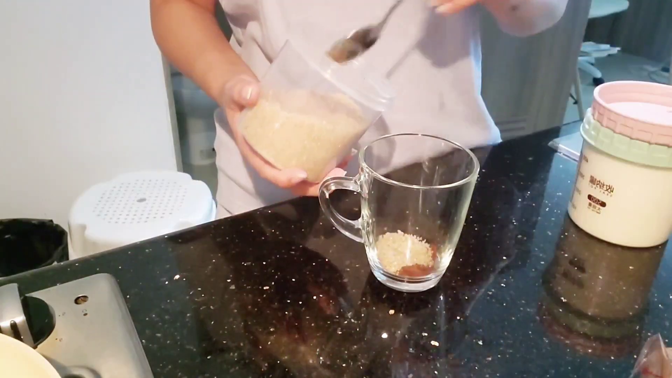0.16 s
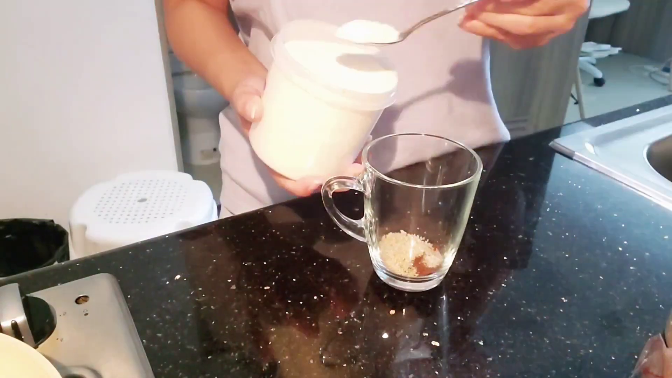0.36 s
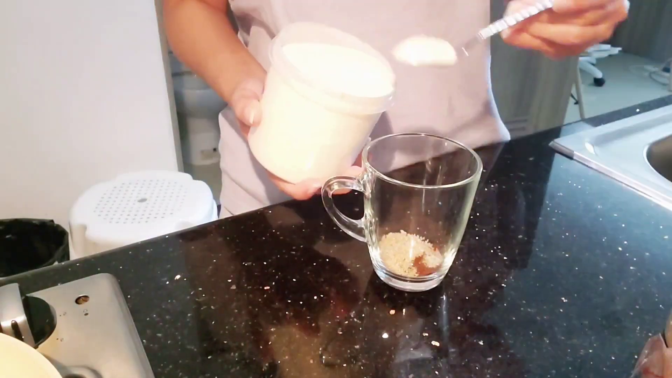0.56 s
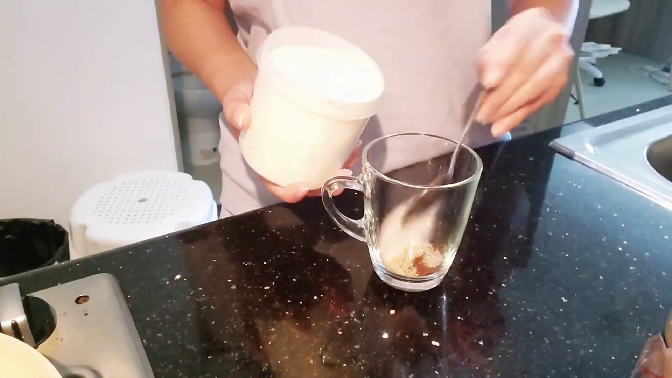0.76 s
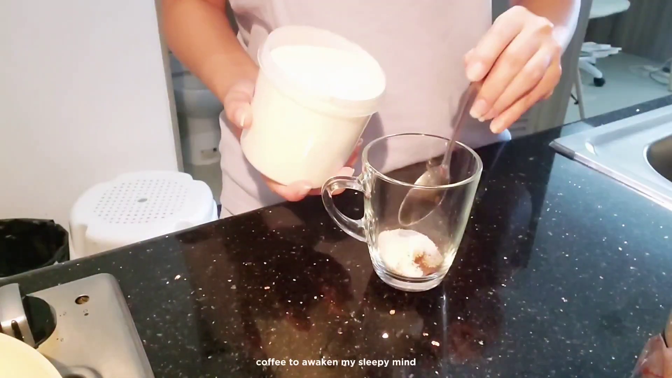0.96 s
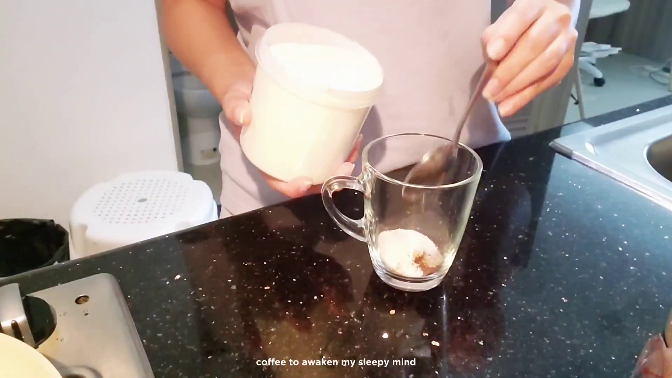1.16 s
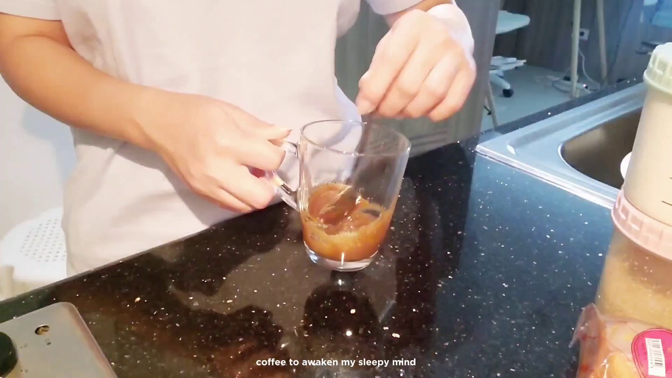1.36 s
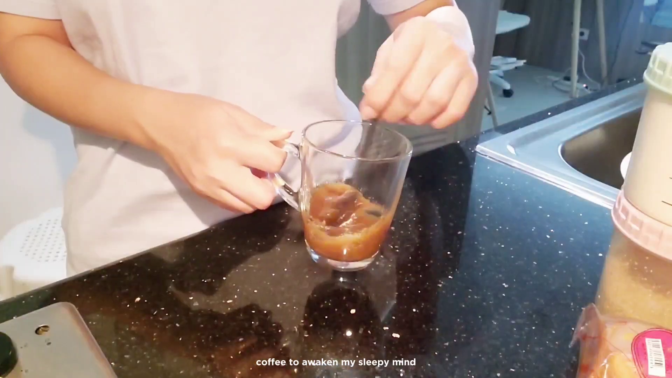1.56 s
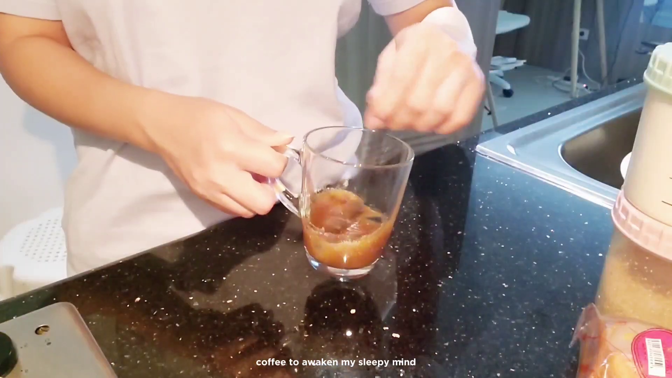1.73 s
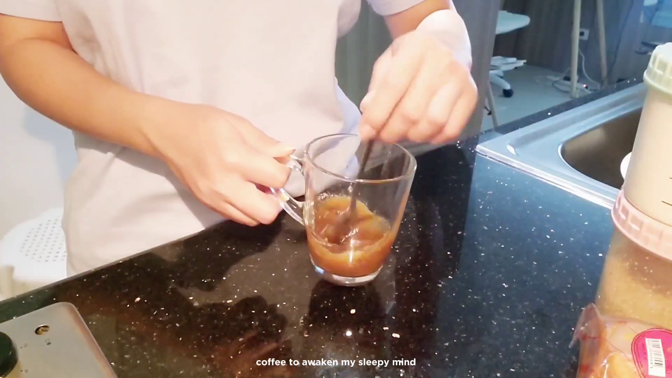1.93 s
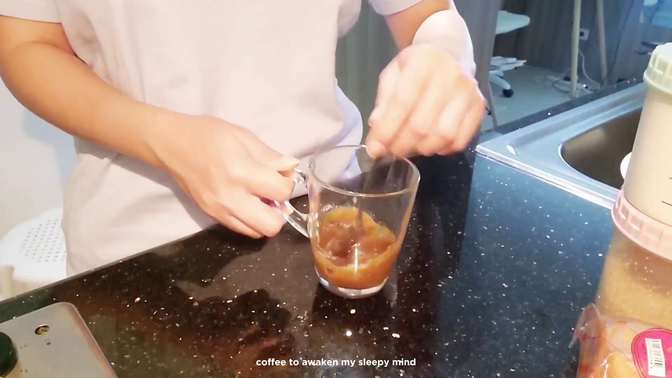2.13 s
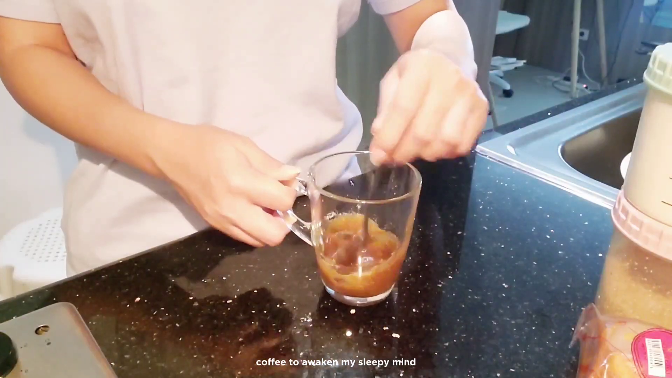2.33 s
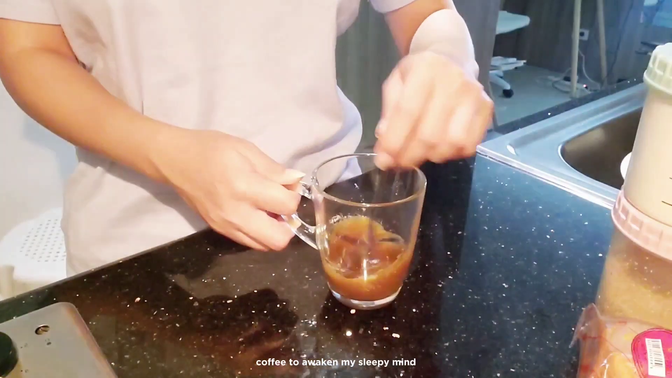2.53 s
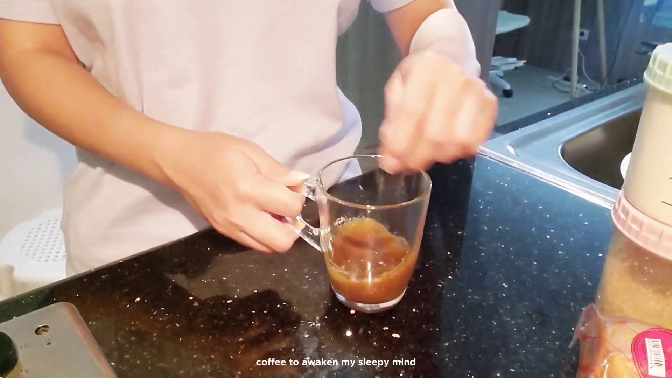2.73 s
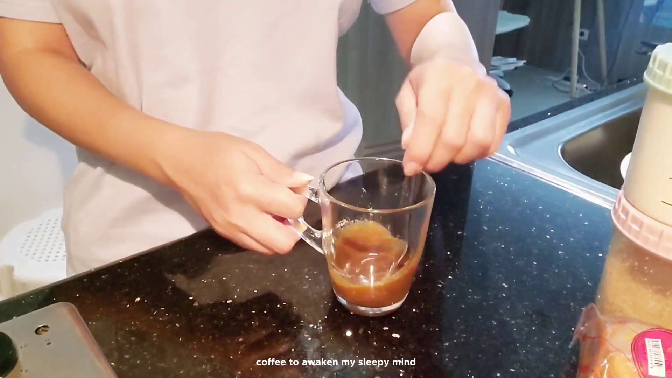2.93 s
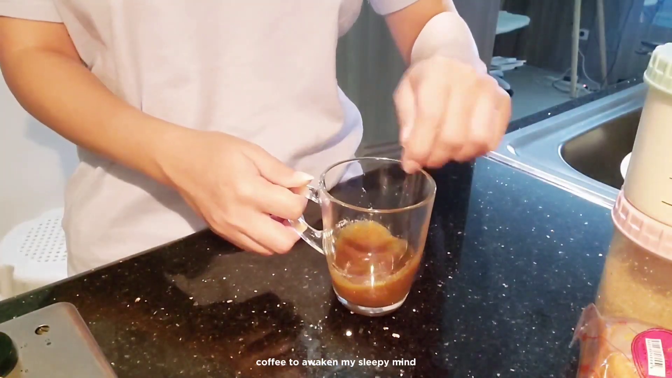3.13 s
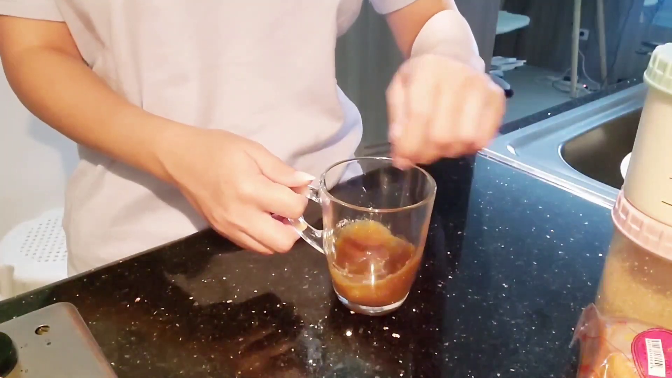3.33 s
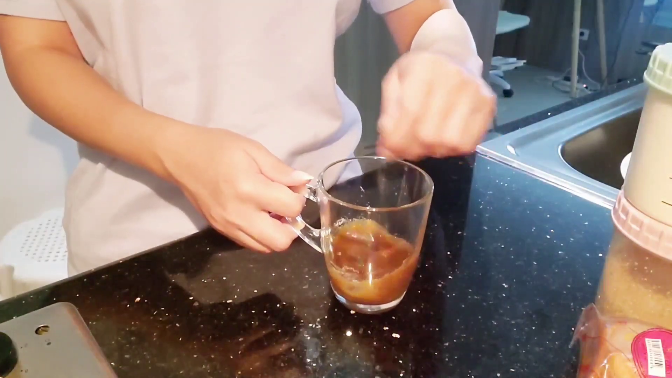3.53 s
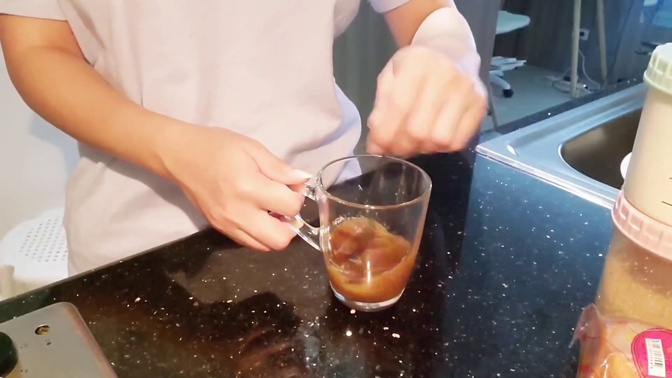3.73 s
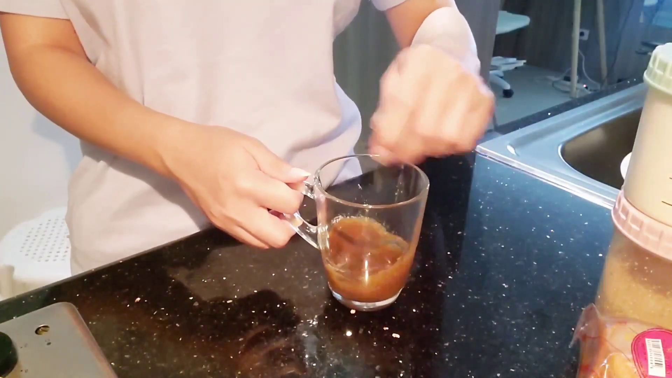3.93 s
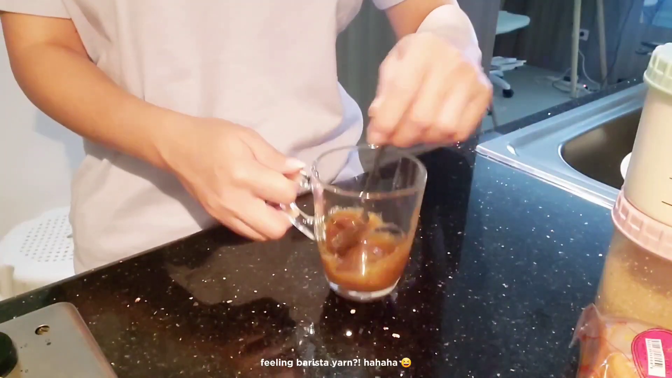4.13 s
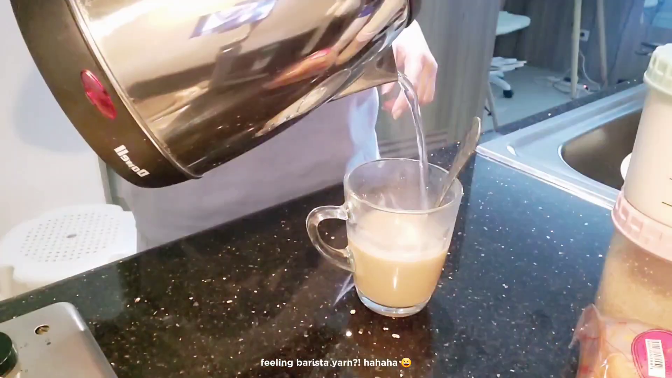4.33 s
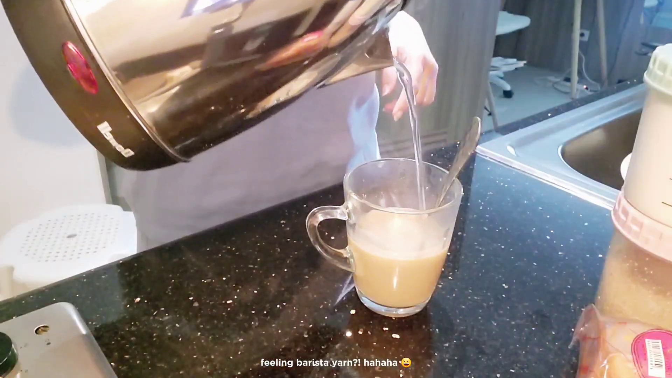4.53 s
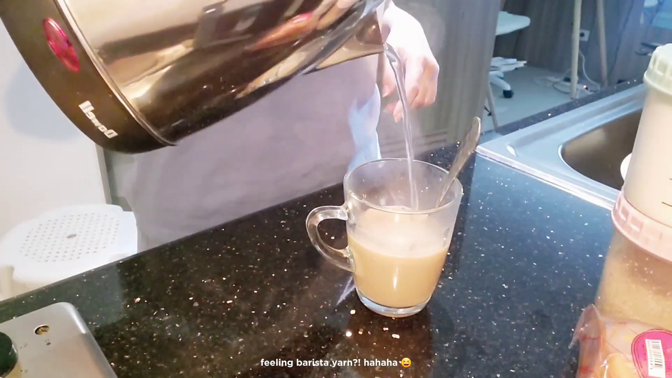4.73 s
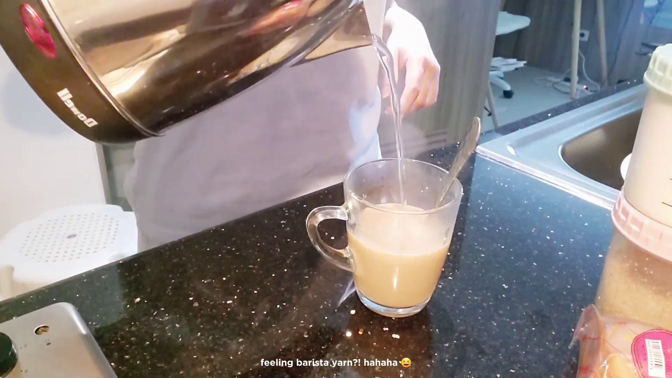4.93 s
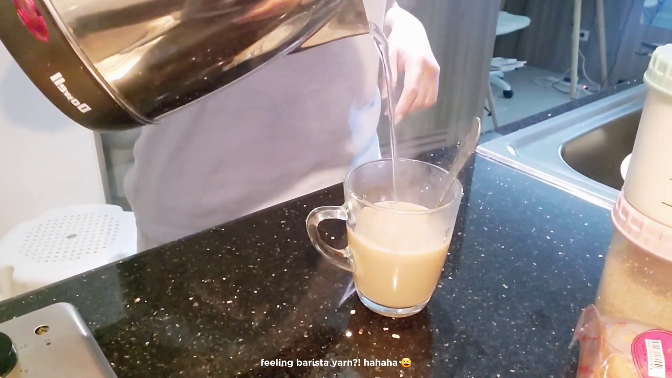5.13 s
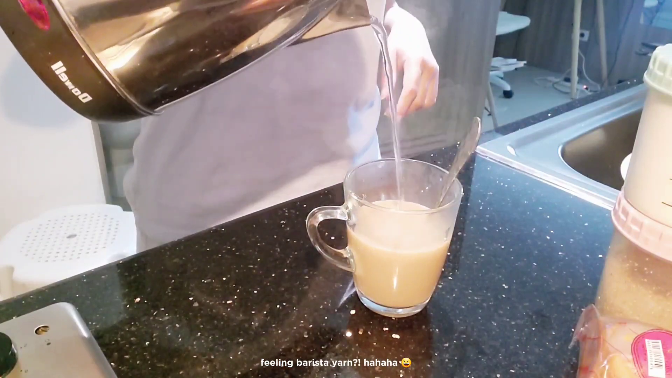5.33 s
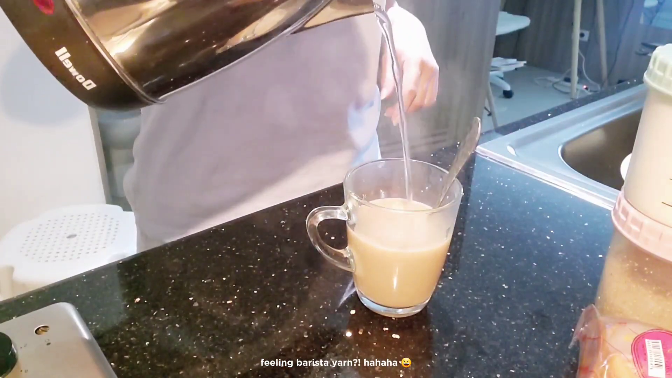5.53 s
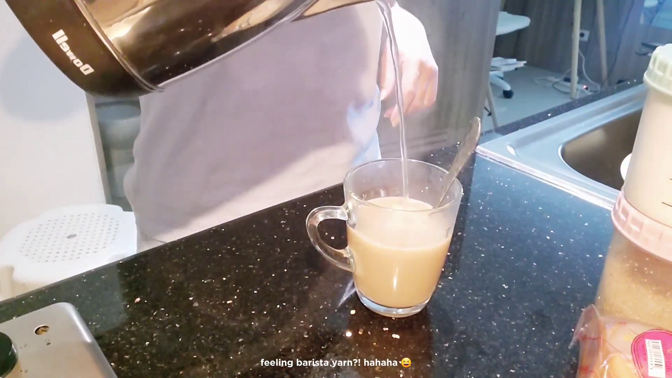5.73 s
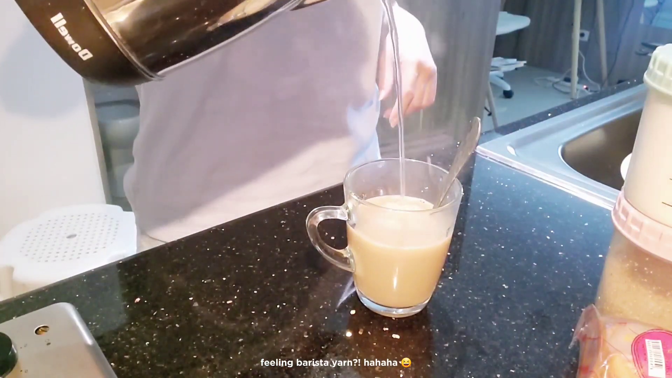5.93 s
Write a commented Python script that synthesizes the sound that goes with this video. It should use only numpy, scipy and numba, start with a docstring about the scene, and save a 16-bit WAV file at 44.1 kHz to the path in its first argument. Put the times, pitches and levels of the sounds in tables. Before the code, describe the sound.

Low rumble alone for over a second, then lively stirring close by: sharp, dry knocks of metal on glass, some loud, some barely there, joined by grainy rubbing along the wall and faint thuds of the stone counter. Afterwards comes a gentle, hissy pour with little wet ticks and a pair of dim distant hoots. Close phone pickup, short bright reflections, constant hiss.

```python
"""Stirring coffee in a glass mug

A steel spoon stirs a little thick coffee in a glass mug on a stone counter; then water is poured in gently.
Spoon knocks and scrapes are short pushes and gritty noise that set off families of quickly fading modes.
Droplets tick and spray, and two faint toots sound. Shaped noise makes the room air with the trickle,
low building rumble and a hiss that steps up once, just before the first knock. A phone nearby hears it all."""
import sys
import numpy as np
from scipy import signal
from scipy.fft import rfft, irfft
from scipy.io import wavfile
from numba import njit

SR = 44100
rng = np.random.default_rng(int(sys.argv[2]) if len(sys.argv) > 2 else 0)


def generate_wav(signal):
    """Clip the signal to [-1, 1] and save it as 16-bit WAV at the path in sys.argv[1]."""
    frames = np.transpose(np.atleast_2d(signal))
    scaled = np.clip(frames, -1, 1) * 32767
    pcm = np.round(scaled).astype(np.int16)
    wavfile.write(sys.argv[1], SR, pcm)


N = 267642

# pitches at which the strength of a bright crack or spray is set [Hz]
TREBLE_HZ = np.arange(7000, 15000, 700)


def spoon():
    """Knocks and the gritty drag of steel on sugar drive the same modes; the counter thuds below."""
    # modes of mug and spoon in seven families, low to high; the fourth is the rim:
    # f/Hz, level/dB, time to fall 60 dB t60/s, left minus right/dB, phase by which left leads/rad
    mug = [
        [(562, -22.5, 0.2, -2, 0.33), (637.6, 2.5, 0.051, -8, 0.98), (724, -0.5, 0.056, -8.5, 4.5)],
        [(918, 1.5, 0.097, 1, 3.5), (960, -5.5, 0.085, 12.5, 3.5), (995, -7.5, 0.033, 14.5, -3)],
        [(1146, -1, 0.017, -26, -1.7), (1388, 2, 0.017, 13.5, -1.55), (1642, 0.5, 0.02, -9.5, -1.36)],
        [(1864, -4, .19, 2.1, .2), (1890, -2, .035, 1.1, .4)],
        [(2220, -9, 0.027, 20, 0.3), (2350, -6, 0.066, 0.5, 0.32), (2560, -2.5, 0.036, -6, 0.39),
         (2734, -4, 0.027, 22, 0.89), (3003, 2, 0.0098, -22.5, 2.6), (3228, 2, 0.049, 6, 1.54)],
        [(3813, -7, 0.045, 7, 4), (4175, 1.5, 0.013, -7, 0.9), (4480, -8, 0.014, 25, 3.5),
         (5140, -1.5, 0.0095, -25, 4.5), (5490, 1, 0.0091, -15, -1), (5550, -9, 0.018, 27, -3.5),
         (6050, -6.5, 0.015, -14.5, 7.5)],
        [(6580, -9, 0.015, -4, 0), (7820, -11.5, 0.011, -7.5, -6), (9700, -7.5, 0.012, 5, -1.5)],
    ]
    # modes of the stone counter, columns as in mug
    counter = [(114.6, -1, 0.22, 0.5, 0), (242, -3.5, 0.078, -6, 0), (360, -2, 0.11, 1, 0)]
    # knocks, before the family levels: t/s, peak level/dB, then relative to the peak: dull body/dB,
    # rim ring/dB, bright edge/dB, tick/dB, counter thud/dB; pitches the struck spot favours: lower f/Hz, upper f/Hz
    knocks = [(1.359, -20, -40, -18, -6, -10, -33, 1720, 3856),
              (1.397, -15, -41, -32, -23, -31, -44, 2250, 3820),
              (1.451, -28, -23, -22, -17, -21, -14, 3200, 3820),
              (1.5, -11, -21.5, -30, -9.5, -18.5, -25.5, 3246, 5370),
              (1.537, -17.5, -18, -21, -8, -15.5, -18.5, 2290, 5400),
              (1.721, -29, -7.5, -16.5, -19, -14.5, -30, 2390, 5640),
              (1.755, -35.5, -9, -21, -1, -16, -25, 2870, 5580),
              (1.852, -30.5, -27, -21, -13, -7.5, -2, 3100, 5430),
              (1.882, -23, -19, -28, -4, -17, -18, 1170, 5450),
              (1.922, -15, -13, -11.5, -18, -10.5, -24, 2250, 5600),
              (1.962, -26, -15, -33, -9, -11.5, -23, 3000, 5430),
              (2.057, -14, -23, -31, -11, -21, -26, 2800, 5030),
              (2.24, -20, -11.5, -26, -13, -20, -15, 2793, 3940),
              (2.318, -37, -20, -18, -24, -19, -3, 2080, 3890),
              (2.418, -27, -24, -11, -15, -11, -11, 2100, 4970),
              (2.437, -6.5, -22.5, -21, -24, -33, -18, 1400, 4200),
              (2.537, 0, -19.5, -31, -31, -57, -18, 2572, 4690),
              (2.867, -23.5, -5.5, -27, -15, -13, -30, 1524, 5980),
              (2.914, -16, -16.5, -36, -11, -20, -20, 2860, 5660),
              (3.079, -16, -20, -33, -12.5, -22, -29, 1186, 5700),
              (3.168, -20, -14, -42, -14, -21, -29, 2683, 5060),
              (3.401, -19, -8, -24, -27, -14, -29, 1690, 4060),
              (3.522, -15.5, -12, -29, -7.5, -17, -16.5, 2742, 5540),
              (3.713, -13, -11.5, -40, -11, -18, -17, 3040, 4110),
              (3.863, -18.5, -39, -23, -17, -7.5, -38, 2050, 4000),
              (3.903, -12.5, -13.5, -42, -19, -30, -15, 1700, 5750),
              (3.952, -12.5, -31, -36, -14, -30.5, -33, 1390, 5480),
              (4.067, -12.5, -13.5, -25, -20, -18, -16, 1115, 4380),
              (4.309, -30.5, -30, -28, -22, -9.5, -34, 2780, 3850),
              (4.332, -22.5, -40, -23, -16.5, -28, -17, 2775, 4860),
              (4.381, -17.5, -19.5, -46, -19.5, -28, -16, 1290, 5960)]
    # how readily a knock drives each family: level/dB
    knock_db = [3, -14, -20.5, 7.5, -20.5, 1.5, 3]
    # scraping between knocks, before the family shares:
    # t/s, low families level/dB, rim level/dB, upper families and grit level/dB
    scrape = [(1.36, -60, -74, -62), (1.42, -54, -71, -47.5), (1.58, -48, -68, -48),
              (1.85, -54.5, -83, -67), (2.12, -47, -49, -49), (2.3, -48, -61, -60), (2.45, -55, -74, -57),
              (2.64, -40.5, -65, -61), (2.85, -51, -63, -57), (3.19, -41.5, -56.5, -50.5),
              (3.52, -49.5, -69, -58.5), (3.93, -56, -65, -46.5), (4.12, -48, -48, -49),
              (4.2, -51.5, -57, -50), (4.42, -63, -64, -61)]
    # share of the drag in each family: level/dB
    drag_db = [-10, 2.5, -17.5, 1, -8.5, -19, -12]
    # swipes along the wall that swell and fade, before the family levels: t/s, level/dB, slosh pitch f/Hz,
    # brightness added towards the top/dB, half length (to 1/e)/s
    swipes = [(1.386, -37.5, 1000, 20.5, 0.023), (1.453, -38, 940, -12, 0.012),
              (1.529, -38, 970, 26, 0.0082), (1.605, -27.5, 940, -12.5, 0.015),
              (1.882, -42.5, 900, 27.5, 0.015), (1.942, -38.5, 840, 15.5, 0.029),
              (2.093, -38.5, 760, -6, 0.036), (2.18, -30, 890, -7, 0.009), (2.293, -36, 760, -26, 0.021),
              (2.441, -26.5, 1100, 13.5, 0.012), (2.453, -30, 720, 10, 0.023), (2.55, -27.5, 720, 0, 0.028),
              (2.629, -32.5, 1160, 4, 0.019), (2.68, -37, 834, -11, 0.012), (2.746, -29.5, 875, -21, 0.023),
              (2.902, -32.5, 940, 24, 0.013), (2.958, -44, 900, -1, 0.012),
              (3.043, -21.5, 800, -16.5, 0.0091), (3.258, -25, 1200, -7, 0.0063),
              (3.326, -58, 900, 0, 0.0078), (3.43, -30, 860, -18, .0065), (3.74, -36.5, 985, 6, 0.017),
              (3.784, -37.5, 1140, 1, 0.011), (3.897, -28.5, 820, 17.5, 0.011), (3.99, -39, 860, 13, .013),
              (4.108, -31.5, 970, -16, 0.028), (4.231, -49, 940, 30.5, 0.022), (4.34, -45, 1000, 8, 0.0049)]
    # each family in a swipe: level/dB, share of the brightness (0-1), fall away from the slosh pitch/dB per octave
    swipe_families = [(3.5, 0, 31.5), (3.5, 0, 19), (2.5, 0.2, 26), (-27, 0, 6), (-15, 0.56, -0.5),
                      (-25, 0.98, 1), (-26, 1, 0.5)]
    spot_lift_db, spot_octaves = 8.5, 0.32  # lift of a family near the spot's pitch, and how near

    s, peak, body, rim, edge, tick, thud_db, lower, upper = np.transpose(knocks)
    chatter_s = 0.0022 + 0 * s
    family_hz = [np.mean([mode[0] for mode in modes]) for modes in mug]

    def near(k):
        """Lift of a family whose mean pitch lies near the lower pitch of the struck spot."""
        octaves = np.log2(lower / family_hz[k])
        return spot_lift_db * np.exp(-(octaves / spot_octaves) ** 2)

    shares = [body, 0, near(2), rim, near(4), edge, tick]
    family_db = [peak + share + db for share, db in zip(shares, knock_db)]
    favoured = [None, None, lower, None, lower, upper, None]

    middle, swipe_db, slosh, bright, half = np.transpose(swipes)
    low, tone, high = (undb(c) for c in curves(scrape))
    stirring = (np.arange(N) > scrape[0][0] * SR) & (np.arange(N) < scrape[-1][0] * SR)
    drag = [c * undb(db) for c, db in zip([low, low, low, tone, high, high, high], drag_db)]
    grain_size = undb(2 * rng.exponential(size=N))

    out = 0
    for k, modes in enumerate(mug):
        # steady friction builds up in a mode for as long as it rings
        build = np.sqrt(sum(undb(2 * m[1]) * m[2] * SR / (4 * np.log(1000)) for m in modes))
        grains = rng.standard_normal(N) * grain_size * glide(undb(2 * knots(60)))
        grains = grains / grains.std()
        level_db, share, fall_db = swipe_families[k]
        distance = np.abs(np.log2(slosh / family_hz[k]))
        colour = level_db + share * bright - fall_db * distance
        rubbing = stirring * drag[k] + swells(middle, swipe_db + colour - 3.5, half)
        friction = rubbing * grains
        mode_hz = [m[0] for m in modes]
        blows = bursts(s, family_db[k] - 3.5, chatter_s, mode_hz, favoured[k], favour=0.39)
        # sloshing detunes the rim least
        wander = .003 if k == 3 else .009
        out = out + ring(blows + friction / build, modes, wander=wander, spot_db=2.5)

    # the top family's force is also heard directly, as crack and rasp
    crack = [band(bursts(s, family_db[-1] + 25, 2.9 * chatter_s, TREBLE_HZ), 2900, 16400) for _ in range(2)]
    top_friction = friction  # the loop ends on the top family
    rasp = undb(6.5) * band(top_friction * rng.standard_normal((2, N)), 9000, 15000)
    # the heavy slab is pushed smoothly and answers late
    slab_push = bursts(s + 0.00593, peak + thud_db + 0.5, .5 * chatter_s, [counter[0][0]], rough=0)
    return out + np.array(crack) + rasp + ring(slab_push, counter)


def pouring():
    """A few droplets each ring two very short modes and add a burst of bright spray noise."""
    # droplet ticks, before fixed offsets: t/s, level/dB, f/Hz, spray relative to the tick/dB
    drops = [(5.3006, -20, 1460, -15.5), (5.321, -25, 1380, -21), (5.355, -37.5, 1680, 1),
             (6.043, -31, 1420, -5)]
    s, db, hz, spray_db = np.transpose(drops)
    out = 0
    for start, level, f in zip(s, db, hz):
        push = bursts([start], [level - 9], [.007], [f, 0.43 * f, 1.5 * f])
        out = out + ring(push, [(f, 3.0, .008, 0, .3), (0.4 * f, -3.0, .02, 0, .1)])
    spray = [band(bursts(s, db + spray_db + 23.5, 0.0058 + 0 * s, TREBLE_HZ), 2000, 18000) for _ in range(2)]
    return out + spray


def toots():
    """Two brief faint toots, perhaps a distant horn: five partials speak at staggered times and flutter."""
    # toots, before the flutter; the level is that of the third partial, and the others are relative to it:
    # start t/s, length/s, level/dB, second partial/dB, fourth and fifth partial/dB
    toot_rows = [(5.04, 0.06, -49, -7, -6), (5.142, 0.052, -49.5, 1, -13)]
    # how late each partial speaks, first to fifth: delay/s
    lags = [0.027, 0.035, 0.002, 0.002, .015]
    pitch_hz, edge_s, first_db = 577.6, 0.018, 1.5  # the first partial too is relative to the third
    t = np.arange(N) / SR
    # the pitch trembles slightly about its centre
    turn = 2 * np.pi * np.cumsum(pitch_hz * (1 + 0.0051 * glide(knots(60)))) / SR
    phases = 0.3 * rng.uniform(0, 2 * np.pi, (5, 2, 1))  # partial, ear
    out = 0
    for k, lag in enumerate(lags):
        flutter = undb(3.2 * glide(knots(90)))
        wave = np.sqrt(2) * flutter * np.sin((k + 1) * turn + phases[k])
        for start, length, db, second_db, top_db in toot_rows:
            to_edge = np.minimum(t - lag - start, start + lag + length - t)
            on = np.clip(to_edge / edge_s + .5, 0, 1)
            partial_db = [first_db, second_db, 0, top_db, top_db][k]
            out = out + on * undb(db + partial_db) * wave
    return out


def room(dry):
    """Hard tiles return a short, evenly fading wash, unrelated left and right."""
    t60_s, wash_db = 0.13, -10
    t = np.arange(int(.4 * SR)) / SR
    tail = band(rng.standard_normal((2, len(t))), 300, 14400)
    tail = tail * undb(-60 * t / t60_s) * (t > .004)
    tail *= undb(wash_db) / np.sqrt(np.sum(tail ** 2, axis=1, keepdims=True))
    # each ear's wash comes from the other ear's sound
    return dry + signal.fftconvolve(dry[::-1], tail, axes=1)[:, :N]


def background():
    """Four shaped noises: the two rumbles are more alike in both ears than the air and the hiss."""
    # rumble levels over time, before flicker: t/s, deep rumble level/dB, upper rumble level/dB
    rumble_levels = [(0.0, -40, -50.5), (.3, -38.5, -42.5), (.55, -40.5, -49.5), (.85, -44, -47.5),
                     (1.3, -42.5, -49.5), (2.2, -42, -50.5), (2.55, -44.5, -45), (3.3, -39.5, -51),
                     (4.2, -44, -51), (4.56, -37, -41.5), (5.0, -38, -43.5), (6.07, -37.5, -49.5)]
    # steadier levels, before flicker: t/s, room air and trickle level/dB, hiss level before a fixed lift/dB
    steady_levels = [(0, -55.5, -60), (.5, -57, -60), (1.355, -57, -59.5), (1.36, -53, -51.5),
                     (4.41, -50, -50), (4.43, -52, -51), (5.2, -48, -51.5), (6.07, -49.5, -51)]
    # spectrum of the deep rumble: f/Hz, relative level/dB per Hz
    deep_shape = [(8.8, -27), (15, -12), (59, 0.5), (70, -0.5), (81, -1), (97, -8), (129, -5), (170, -28),
                  (220, -18.5), (370, -120)]
    # spectrum of the upper rumble: f/Hz, relative level/dB per Hz
    upper_shape = [(82, -6.5), (140, -1), (167, -6.5), (265, -2), (313, -11.5), (349, -5.5), (367, -17.5),
                   (480, -22), (620, -29), (1060, -120)]
    # spectrum of room air and trickle: f/Hz, relative level/dB per Hz
    air_shape = [(250, -1), (420, -8), (495, -49), (541, -0.5), (687, -6), (866, -1.5), (1070, -8),
                 (2500, -14.5), (3250, -14.5), (5500, -120)]
    # spectrum of the hiss: f/Hz, relative level/dB per Hz
    hiss_shape = [(1060, 0), (1800, -9.5), (1950, -9.5), (3710, -1.5), (4620, -3), (7220, -3), (8210, -4.5),
                  (11700, -1), (13200, -2), (14900, 0.5), (16000, -5)]
    deep, upper, air, hiss = (undb(c) for c in curves(rumble_levels) + curves(steady_levels))
    # the level dips briefly, once
    dip_s, dip_length_s, dip_db = 0.488, 0.008, -12
    dip = undb(dip_db * np.exp(-((np.arange(N) / SR - dip_s) / dip_length_s) ** 2))
    rumble = deep * noise(deep_shape, 0.99, 0.68, 1.96) + upper * noise(upper_shape, 0.71, -3.0, 1.78)
    air_noise = air * noise(air_shape, 0.053, -1.0, 0.91)
    hiss_noise = undb(4.0) * hiss * noise(hiss_shape, 0.01, 0.87, 0.091)
    return dip * (rumble + air_noise + hiss_noise)


def bursts(times, db, lengths, hz, favoured_hz=None, favour=0., rough=0.84, rise=0.00083, swell_s=0.0046,
           swell_db=-17):
    """Decaying chatter of contact forces; db is the strength that reaches modes at the pitches hz."""
    out = np.zeros(N + 2048)
    t = np.arange(-768, 1280) / SR  # starts before the contact
    probe = np.exp(2j * np.pi * np.outer(hz, t))
    chances = rng.standard_normal((len(times), 2048))
    for k, (s, gain, length) in enumerate(zip(times, undb(db), lengths)):
        push = 1 - rough + rough * chances[k]
        if favoured_hz is not None:
            push = push + favour * np.sin(2 * np.pi * favoured_hz[k] * t)
        blow = (t > 0) * np.exp(-t / max(length, 1e-4)) * (1 - np.exp(-np.abs(t) / rise))
        # a faint noisy swell rises and fades around each contact
        swell = rough * undb(swell_db) * np.exp(-np.abs(t) / swell_s)
        push = push * (blow + swell)
        strength = np.sqrt(np.mean(np.abs(probe @ push) ** 2))
        out[np.rint((s + t) * SR).astype(int)] += gain * push / strength
    return out[:N]


def swells(times, db, lengths):
    """Bell-shaped drag levels, one swell for each swipe."""
    out, steps = np.zeros(N), np.arange(-4096, 4096)
    for s, gain, length in zip(times, undb(db), lengths):
        out[int(s * SR) + steps] += gain * np.exp(-(steps / SR / length) ** 2)
    return out


def ring(force, modes, wander=0., spot_db=0.):
    """Damped modes with own balance and phase at two ears; sloshing detunes them, the struck spot moves."""
    out = np.zeros((2, N))
    for hz, db, t60, pan_db, lead in modes:
        turn = glide(2 * np.pi * hz / SR * (1 + wander * knots(20)))
        decay = np.exp(-np.log(1000) / (t60 * SR))
        left, right = (undb(db + k * pan_db) * np.exp(1j * k * lead) for k in (.5, -.5))
        spot = glide(undb(spot_db * knots(10)))
        out += resonate(force * spot, turn, decay, left, right)
    return out


@njit
def resonate(force, turn, decay, left, right):
    """One damped mode, a shrinking turning arrow, whose pitch may move every sample, heard at two ears."""
    z, out = 0j, np.zeros((2, len(force)))
    for i in range(len(force)):
        # skip the work while the mode is silent
        if force[i] != 0 or abs(z.real) + abs(z.imag) > 1e-7:
            z = z * decay * complex(np.cos(turn[i]), np.sin(turn[i])) + force[i]
            out[0, i], out[1, i] = (z * left).imag, (z * right).imag
    return out


def noise(shape, likeness, pan_db, flicker_db):
    """Stereo noise of a given spectrum, set to rms 1, then panned and flickered; likeness 1 is mono."""
    hz, db = np.transpose(shape)
    f = np.fft.rfftfreq(N, 1 / SR) + 1e-9
    spectrum = undb(np.interp(np.log(f), np.log(hz), db, -99, -99))
    mid, side = irfft(rfft(rng.standard_normal((2, N))) * spectrum, N)
    c = np.clip(likeness, 0, 1)
    pair = np.sqrt(1 + c) * mid + np.sqrt(1 - c) * side * np.array([[1], [-1]])
    pan = undb(np.array([[pan_db], [-pan_db]]) / 2)
    return pair / pair.std() * pan * glide(undb(flicker_db * knots(9)))


def band(x, lo_hz, hi_hz):
    """Keep the pitches between two edges."""
    edges = [lo_hz, min(hi_hz, .45 * SR)]
    return signal.sosfilt(signal.butter(2, edges, "bandpass", fs=SR, output="sos"), x)


def undb(db):
    """Turn decibels into a factor."""
    return 10 ** (np.asarray(db, float) / 20)


def curves(rows):
    """Columns of a table against its times, one value a sample; the ends hold."""
    s, *columns = np.transpose(rows)
    return [np.interp(np.arange(N) / SR, s, c) for c in columns]


def knots(rate):
    """Random values about zero, rate of them a second, with a spread of 1.61."""
    return 1.61 * rng.standard_normal(int(N / SR * rate) + 2)


def glide(levels):
    """Levels spread evenly over the time and joined by straight lines."""
    return np.interp(np.arange(N), np.linspace(0, N, len(levels)), levels)


def scene():
    """The room answers spoon, droplets and toots; the background is added without it."""
    return room(spoon() + pouring() + toots()) + background()


def record(dry):
    """The phone cuts the top steeply, above 15650 Hz."""
    return signal.sosfilt(signal.ellip(10, .2, 60, 15650, fs=SR, output="sos"), dry)


dry = scene()
out = record(dry)
generate_wav(out)
```